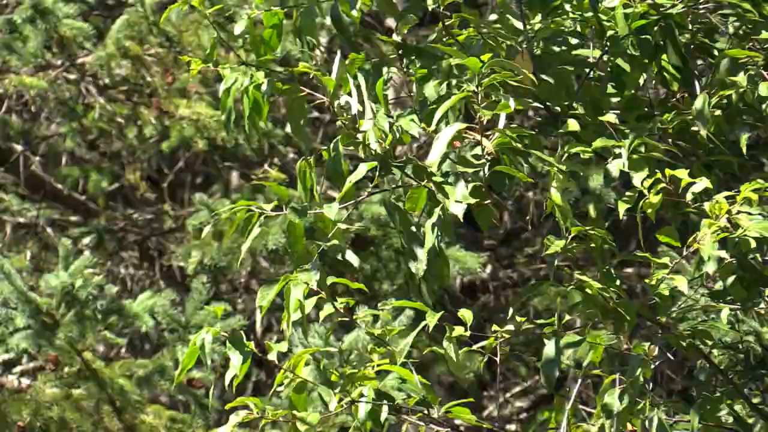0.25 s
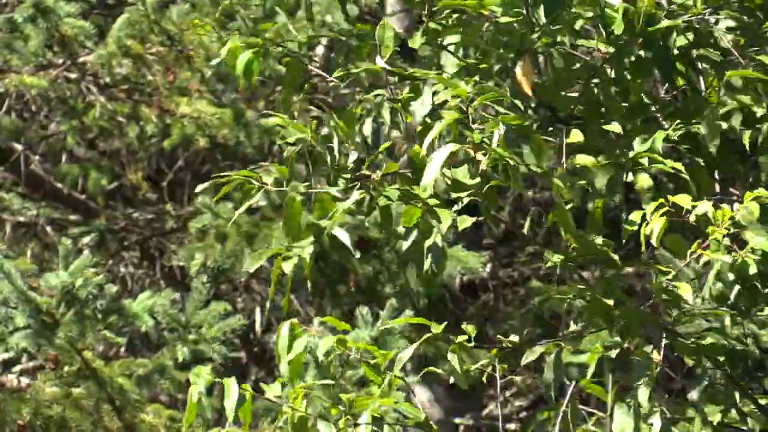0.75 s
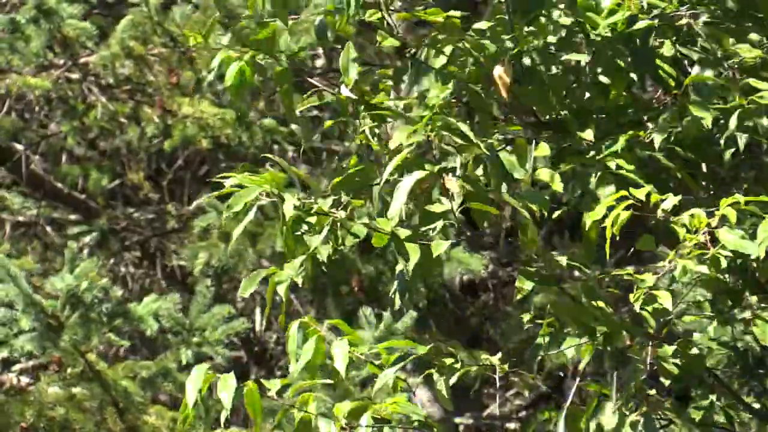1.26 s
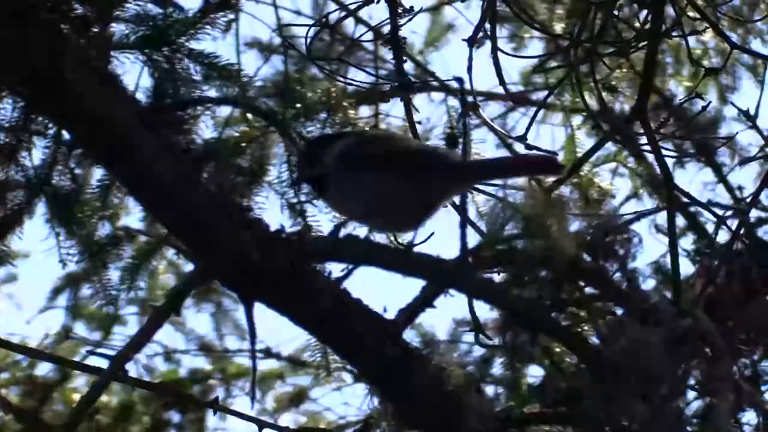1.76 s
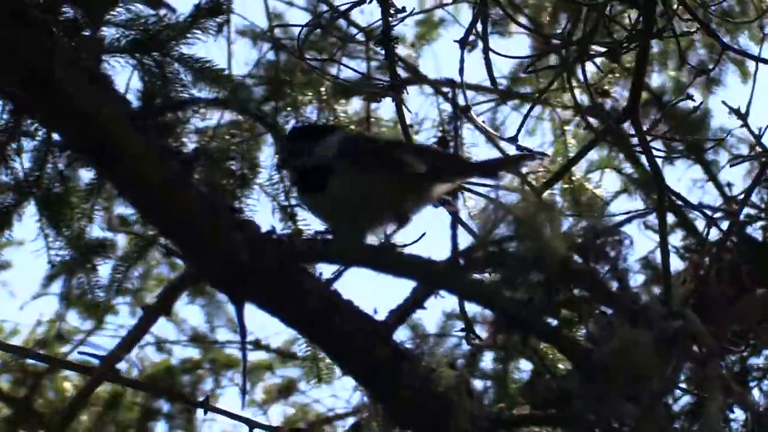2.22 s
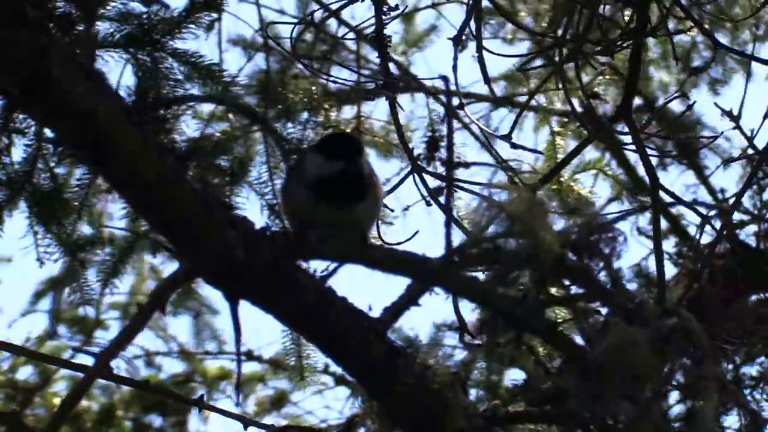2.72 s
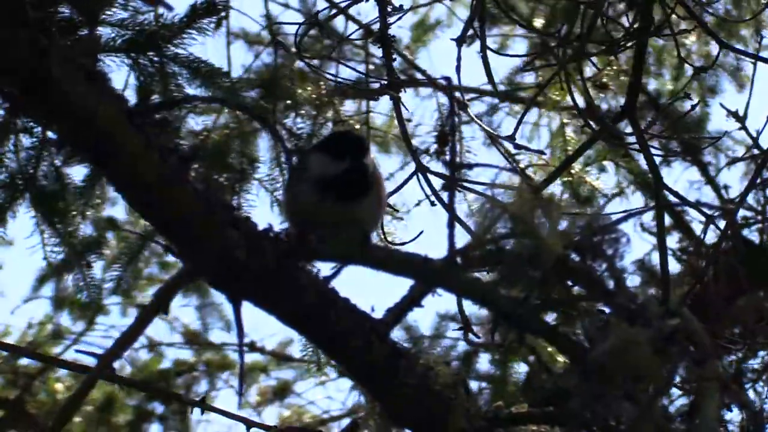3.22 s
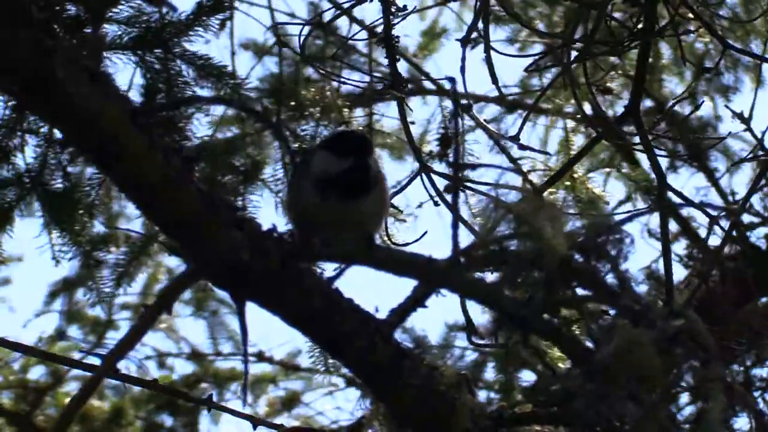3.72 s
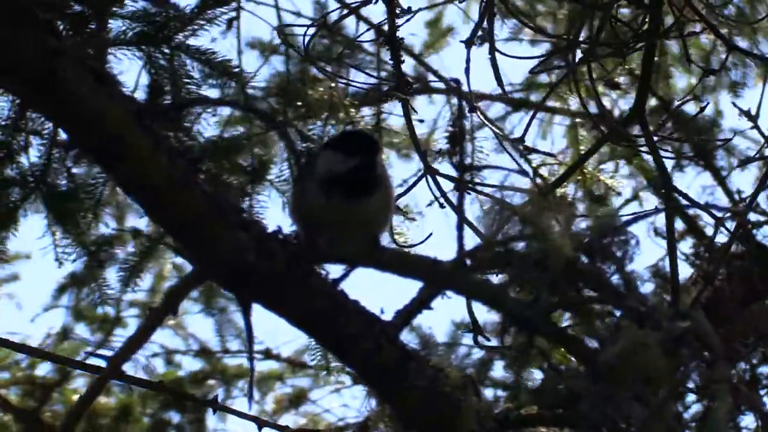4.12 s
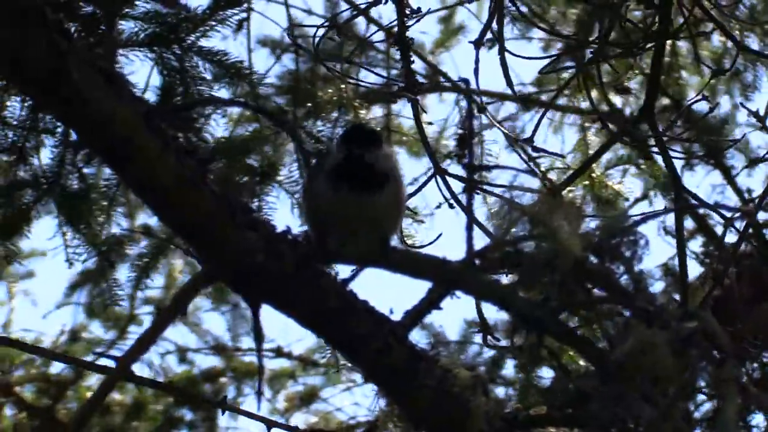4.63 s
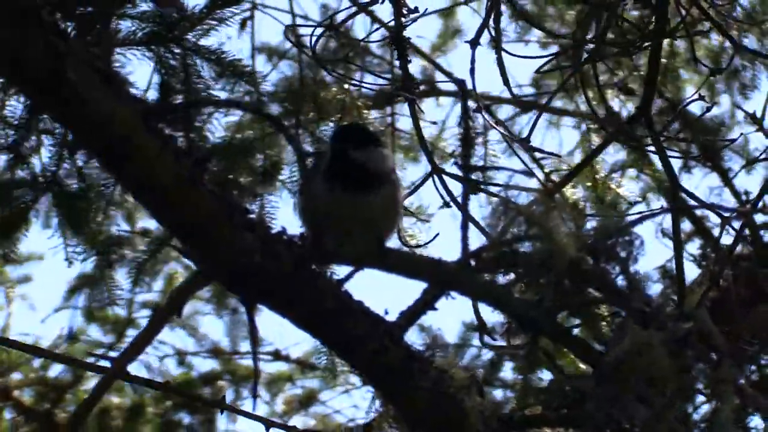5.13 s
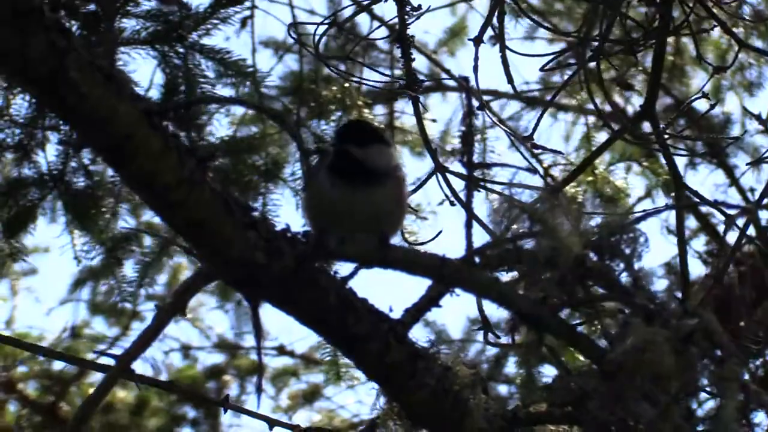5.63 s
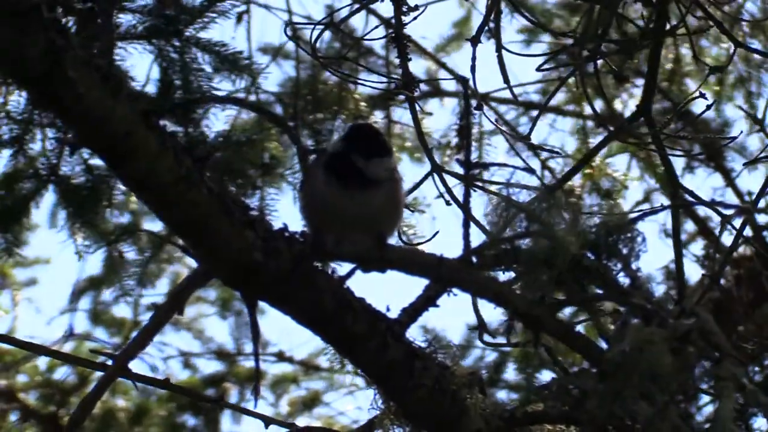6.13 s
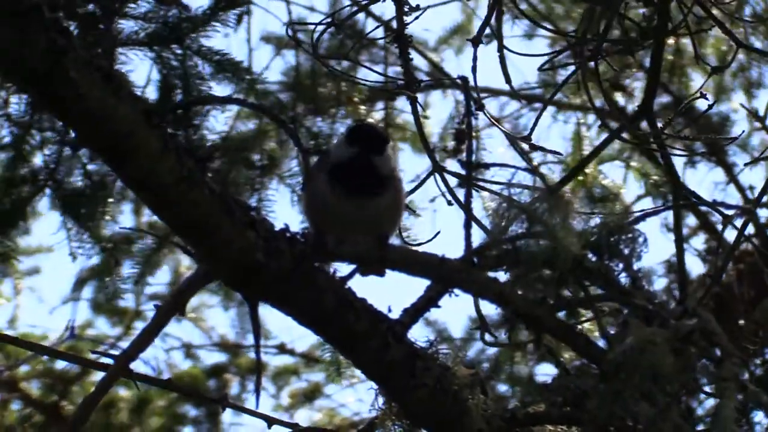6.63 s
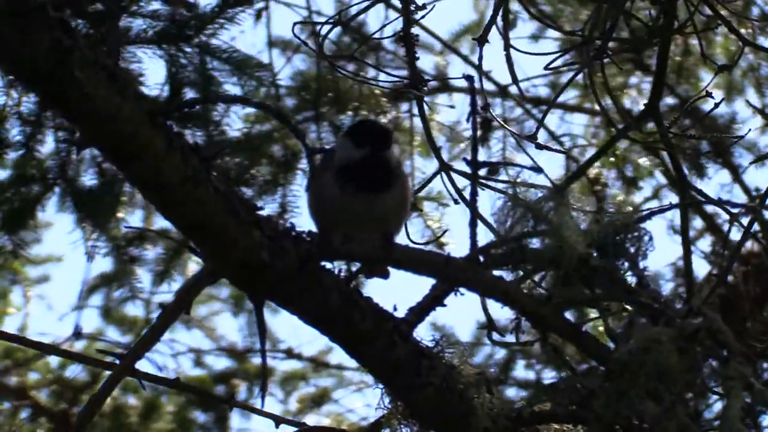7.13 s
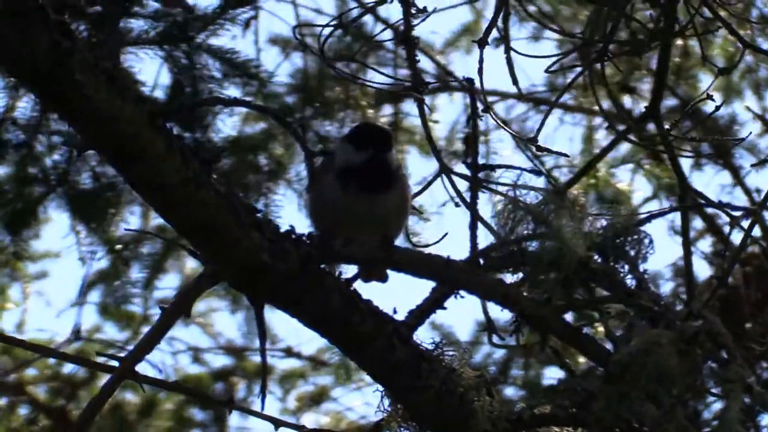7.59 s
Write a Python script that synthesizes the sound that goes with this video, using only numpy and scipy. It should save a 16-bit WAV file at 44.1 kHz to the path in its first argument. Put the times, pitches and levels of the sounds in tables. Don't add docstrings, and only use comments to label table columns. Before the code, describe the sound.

After a brief quiet hiss, raspy 'dee-dee-dee' bird calls come in quick series among conifers, with dull bumps and light wind rumble.

```python
import sys
import numpy as np
from scipy import signal
from scipy.fft import rfft, irfft, next_fast_len
from scipy.io import wavfile
from scipy.ndimage import uniform_filter1d

SR = 44100
rng = np.random.default_rng(int(sys.argv[2]) if len(sys.argv) > 2 else 0)


def voltage_ratio(decibels):
    exponent = np.asarray(decibels, float) / 20
    return 10 ** exponent


def waveform_to_disk(signal):
    frames = np.transpose(np.atleast_2d(signal))
    scaled = np.clip(frames, -1, 1) * 32767
    samples = np.round(scaled).astype(np.int16)
    wavfile.write(sys.argv[1], SR, samples)


N = 346626

# frequency in Hz, density in dB per Hz.
AIR_MID_SPECTRA = [
    [(15, -71), (25, -43), (43, -20), (78, -7), (107, -0.5), (402, -10), (512, -15.5), (1590, -21),
     (2720, -21), (2950, -15), (3200, -19.5), (5060, -23), (11100, -40), (15700, -43)],
    [(15, -26), (25, -13), (59, -22), (137, -1.5), (179, -1), (315, -4.5), (485, -7), (1120, -11),
     (1770, -13.5), (2820, -12), (3050, -9), (3300, -11.5), (4190, -10.7), (15700, -32.5)],
]
# frequency in Hz, density in dB per Hz.
AIR_SIDE_SPECTRA = [
    [(15, -64), (25, -38), (86, -21), (119, 1), (156, -14), (194, -7), (299, -10), (746, -8.5), (1150, -10),
     (2580, -9.5), (2950, -4.5), (4190, -16), (5200, -18.5), (15700, -40.5)],
    [(15, -63), (25, -33), (80, -9), (129, -8.5), (210, -7.5), (283, -10.5), (512, -9.5), (570, -10),
     (1120, -10.5), (1820, -11.5), (2650, -11), (2870, -12), (3120, -11), (15700, -38)],
]
# mid in dB, side in dB.
AIR_LEVELS = [(-51.5, -53.5), (-55.5, -55.5)]
SCENE_CHANGE_S = 1.662
# time in seconds, mid in dB, side in dB.
WIND_GUSTS = [(1.66, -71, -64), (1.85, -56.5, -52), (2.1, -66, -66), (2.45, -65.5, -63), (2.8, -67.5, -63),
              (3.2, -67, -72), (3.7, -67, -72), (4.2, -59, -59), (4.7, -65.5, -66), (5.2, -70, -76),
              (5.55, -66.5, -58), (6.1, -70, -61), (6.6, -69, -56.5), (7.05, -55.5, -46), (7.25, -65, -52),
              (7.5, -53.5, -49), (7.86, -52, -42)]
# frequency in Hz, density in dB.
WIND_MID_SPECTRUM = [(20, -7), (42, -8), (58, 4), (90, 2), (300, -64)]
WIND_SIDE_SPECTRUM = [(30, -44), (70, -4), (130, 0), (300, -22), (500, -57)]
WHINE_HZ, WHINE_DB = 15734, -87
# start in seconds, side peak in dB, mid peak in dB, ring in Hz.
BODY_KNOCKS = [(1.96, -43, -55, 100), (3.607, -34, -44, 135), (4.119, -35, -44, 118),
               (4.6, -29, -44.5, 120), (5.736, -27.5, -39.5, 127), (5.843, -34, -40.5, 93),
               (7.025, -41, -39, 113), (7.138, -42, -48.5, 120), (7.353, -27, -36.5, 110),
               (7.414, -39, -41.5, 117), (7.601, -43, -54, 120), (7.684, -22, -32, 104),
               (7.852, -27, -44, 120)]
# start in seconds, peak in dB.
FINGER_TAPS = [
    (.9105, -43),
    (1.069, -34),
    (1.077, -30),
    (1.0825, -36),
    (1.0856, -30.5),
    (5.737, -40),
]
# start in seconds, peak in dB, ring in Hz, length in seconds.
SNAPS = [
    (1.9375, -28, 9100, 0.0014),
    (3.278, -34, 9000, .001),
    (5.738, -36, 5000, 0.0013),
    (5.821, -29, 7500, .0007),
    (6.44, -35.5, 8900, .001),
]

# start in seconds, length in seconds, effort in dB,
# upper voice at the crest in Hz, gap down to the lower voice in Hz.
DISTANT_NOTES = [
    (5.065, .135, -53.5, 1592, 310),
    (5.27, .09, -58, 1470, 390),
]
FAR_NOTES = [
    (3.456, .1, -44, 1792, 260),
    (3.568, .131, -42, 1807, 319),
    (3.718, .178, -43.5, 1810, 325),
    (3.888, .038, -48, 1830, 288),
]
CHATTER_NOTES = [(1.734, .073, -40.5, 1920, 285), (1.831, .093, -42, 1890, 220),
                 (2.992, .074, -42, 1950, 280), (3.078, .076, -41.5, 1900, 293),
                 (3.168, .081, -41.5, 1930, 262), (3.282, .084, -42.5, 1917, 350),
                 (4.251, .08, -41, 1946, 304), (4.343, .085, -40.5, 1956, 340),
                 (4.45, .084, -41, 1916, 277), (4.554, .077, -41, 1916, 270),
                 (4.658, .078, -40.5, 1940, 270), (4.754, .072, -40, 2010, 266),
                 (4.842, .082, -39.5, 2000, 220), (4.942, .088, -41, 1957, 333),
                 (7.193, .089, -39.5, 1963, 320)]
CHIP_NOTES = [(1.656, .068, -41, 1937, 300), (2.774, .045, -41.5, 1870, 235), (2.841, .055, -42, 2020, 330),
              (2.916, .062, -41.5, 2035, 321), (3.968, .058, -44, 1960, 240), (4.036, .056, -43, 2040, 450),
              (4.101, .056, -41.5, 2020, 270), (4.17, .07, -42, 1916, 260), (6.815, .05, -49, 1950, 280),
              (6.886, .053, -44, 1920, 280), (6.959, .06, -43, 2055, 250), (7.029, .057, -43, 1950, 150),
              (7.116, .06, -42, 1950, 239), (7.326, .068, -45.5, 1880, 260)]
DRAWL_NOTES = [
    (2.416, .091, -36.5, 1768, 352),
    (2.513, .119, -36, 1790, 362),
    (2.644, .138, -36.5, 1772, 354),
    (2.816, .16, -42.5, 1573, 314),
    (6.65, .131, -38.5, 1742, 354),
    (6.798, .171, -39.5, 1726, 346),
    (7.011, .155, -40, 1655, 328),
    (7.205, .135, -45, 1570, 310),
]
OPENER_NOTES = [
    (2.331, .079, -39.5, 1616, 332),
    (6.493, .067, -42, 1595, 314),
    (6.568, .074, -41, 1770, 344),
]
FAR_MIX = [(-40, -27, -36, -17.5, -19.5, -24), (-35, -29, -6, -4.5, -11.5, -15),
           (-10.5, -21, -17, -14, -28, -23), (-28, -33, -30, -24, -32, -29), (-39, -38, -30, -41, -35, -41),
           (-37, -33, -40, -42, -45, -49)]
CHATTER_MIX = [(-29, -70, -39, -13.5, -8.5, -16, -38), (-33.5, -27.5, -4, -3.5, -28.5, -27, -24),
               (-10.5, -13, -18, -7, -34, -19, -30), (-25, -35, -23.5, -21, -43, -34, -34),
               (-28, -32, -40, -26, -56, -48, -65), (-34, -28, -40, -44, -60, -54, -52)]
DRAWL_MIX = [(-74, -70, -16, -8.5, -15), (-12, -5.5, -1.5, -6.5, -9.5), (-9.5, -12, -20, -23, -39),
             (-26, -26, -45, -28, -36), (-41, -35, -41, -44, -50), (-63, -57, -56, -59, -64)]

# attack in seconds, level after the attack in dB, place of the peak from 0 to 1,
# level before the release in dB, release in seconds.
DISTANT_SWELL = (.019, -1.5, .6, -1.5, .019)
FAR_SWELL = (.017, -5.5, .38, -4, .017)
CHATTER_SWELL = (.013, -7, .58, -3, .019)
CHIP_SWELL = (.017, -1.5, .5, -.7, .018)
DRAWL_SWELL = (.012, -6, .62, -2.5, .015)
# time to the crest in seconds, scoop up from 0 to 1, drop after from 0 to 1,
# brightness in dB a multiple, more for each 100 Hz lower in dB, time until the voices lock in seconds.
DISTANT_ARCH = (.07, .12, .095, 4., 1.5, .022)
FAR_ARCH = (.045, .18, .1, -.1, .1, .022)
CHATTER_ARCH = (.054, .2, .17, .1, .1, .019)
CHIP_ARCH = (.029, .28, .2, .1, .1, .014)
DRAWL_ARCH = (.075, .18, .08, .3, 1.3, .027)
OPENER_ARCH = (.045, .2, .06, .3, 1.8, .036)
SHUT_DB, CUT_DB = -30, -26
BREAK_S = .013
LATEST_CREST, PLAIN_HZ = .85, 1780
EDGE_HZ = 15830


def evened(x):
    return x / np.sqrt(np.mean(x ** 2) + 1e-20)


def add(mix, s, sound):
    part = mix[..., round(s * SR):][..., :sound.shape[-1]]
    part += sound[..., :part.shape[-1]]


def coloured(points):
    hz, db = np.transpose(points)
    size = next_fast_len(N, True)
    f = np.fft.rfftfreq(size, 1 / SR)
    weight = voltage_ratio(np.interp(np.log(f + 1), np.log(hz), db))
    return evened(irfft(rfft(rng.standard_normal(size)) * weight, size)[:N])


def wander(length, span_s):
    bell = signal.windows.hann(int(1.5 * span_s * SR) + 3)
    return evened(signal.oaconvolve(rng.standard_normal(length), bell, "same"))


def air():
    shots = []
    for mid, side, (mid_db, side_db) in zip(AIR_MID_SPECTRA, AIR_SIDE_SPECTRA, AIR_LEVELS):
        shots.append(np.array([voltage_ratio(mid_db) * coloured(mid), voltage_ratio(side_db) * coloured(side)]))
    since = np.arange(N) / SR - SCENE_CHANGE_S
    dip = np.clip(abs(since) / 0.0085, .3, 1)
    return np.where(since < 0, *shots) * dip * voltage_ratio(.5 * wander(N, 0.18))


def wind():
    s, *levels = np.transpose(WIND_GUSTS)
    t = np.arange(N) / SR
    rumble = []
    for spectrum, db in zip([WIND_MID_SPECTRUM, WIND_SIDE_SPECTRUM], levels):
        gust_db = np.interp(t, s, db, left=-99) + 4.4 * wander(N, 0.027)
        rumble.append(coloured(spectrum) * voltage_ratio(gust_db))
    return np.array(rumble)


def whine():
    return voltage_ratio(WHINE_DB) * np.sqrt(2) * np.sin(2 * np.pi * WHINE_HZ * np.arange(N) / SR)


def knocks():
    out, t = np.zeros((2, N)), np.arange(5000) / SR
    ring = (1 - np.exp(-t / 0.0029)) * np.exp(-t / .011) * 1.86
    for s, side_db, mid_db, hz in BODY_KNOCKS:
        for delay, bounce_db in [(0, -0.5), (.025, -3.5), (.052, -15)]:
            late, detune, turn = rng.random(3)
            side = np.sin(2 * np.pi * hz * (1.05 - 0.21 * detune) * t)
            mid = np.sin(2 * np.pi * hz * (0.592 + 0.54 * turn) * t + 2.03)
            side += 0.32 * np.sin(2 * np.pi * 1.95 * hz * t) * np.exp(-t / .01)
            mid += 0.31 * np.sin(2 * np.pi * 2.19 * hz * t) * np.exp(-t / 0.0082)
            blow = np.array([voltage_ratio(mid_db) * mid, voltage_ratio(side_db) * side])
            add(out, s + delay * (.9 + 0.266 * late), voltage_ratio(bounce_db) * ring * blow)
    mid = signal.lfilter(*signal.butter(2, 35, "high", fs=SR), out[0])
    side = signal.lfilter(*signal.butter(3, 60, "high", fs=SR), out[1])
    return np.array([mid, side])


def taps():
    out, t = np.zeros(N), np.arange(600) / SR
    push = (1 - t / 0.005) * np.exp(-t / 0.0027) * np.minimum(t / 0.00071, 1)
    for s, db in FINGER_TAPS:
        add(out, s, voltage_ratio(db) * push)
    return signal.lfilter(*signal.butter(2, 70, "high", fs=SR), out)


def clicks():
    out = np.zeros(N)
    for s, db, hz, length in SNAPS:
        t = np.arange(0, length, 1 / SR)
        grit = uniform_filter1d(rng.standard_normal(len(t)), size=3)
        burst = np.sin(2 * np.pi * hz * t) + 0.69 * np.sin(2 * np.pi * 0.36 * hz * t) + 2.1 * grit
        add(out, s, voltage_ratio(db) * 0.31 * burst * np.sin(np.pi * (t / length) ** .6))
    return signal.lfilter(*signal.butter(2, 2000, "high", fs=SR), out)


def wood(x, t60):
    size = SR // 10
    echoes = rng.choice([-1., 1.], (2, size)) * (rng.random((2, size)) < .05)
    echoes *= voltage_ratio(-60 * np.arange(size) / SR / t60)
    echoes[:, :150] = 0
    echoes /= np.linalg.norm(echoes, axis=1)[:, None]
    return signal.oaconvolve(x[None], echoes, axes=1)[:, :N]


def syrinx(t, upper_hz, gap_hz, tones, below, throat, bright_db, flutter_db):
    knots = np.arange(t[0], t[-1] + .012, .012)
    slow = slice(None, None, 32)
    upper, gap = [np.exp(2j * np.pi * np.cumsum(hz) / SR) for hz in (upper_hz, gap_hz)]
    gap_powers = [gap ** (step - below) for step in range(len(tones[0]))]
    voice = np.zeros(len(t), complex)
    for multiple, levels in enumerate(tones, 1):
        partial = upper ** multiple
        for step, tone_db in enumerate(levels):
            hz = multiple * upper_hz[slow] + (step - below) * gap_hz[slow]
            lift_db = bright_db * (multiple - 2)
            for centre, width, lift in throat:
                lift_db = lift_db + lift / (1 + ((hz - centre) / width) ** 2)
            shimmer_db = flutter_db * np.interp(t[slow], knots, rng.standard_normal(len(knots)))
            level = np.interp(t, t[slow], voltage_ratio(tone_db + lift_db + shimmer_db))
            voice += level * partial * gap_powers[step] * np.exp(2j * np.pi * rng.random())
    return voice / np.sqrt(uniform_filter1d(abs(voice) ** 2, 600) / 2)


def note(row, swell, arch, tones, below, throat, waver_hz, flutter_db, rasp_db):
    start, length, peak_db, upper_hz, gap_hz = row
    attack_s, early_db, peak, late_db, release_s = swell
    crest_s, scoop, drop, bright_db, lower_db, lock_s = arch
    s = start + np.sort([0, attack_s, peak * length, length - release_s, length])
    t = np.arange(s[0], s[-1], 1 / SR)

    db = peak_db + np.array([SHUT_DB, early_db, 0, late_db, late_db])
    effort_db = 20 * np.log10(np.interp(t, s, voltage_ratio(.75 * db))) / .75
    effort_db += CUT_DB * np.clip((t - s[-2]) / release_s, 0, 1) ** 1.4

    voiced_s = length - release_s / 2
    crest = min(crest_s / voiced_s, LATEST_CREST)
    u = (t - start) / voiced_s
    rise = scoop * (1 - u / crest) ** 2
    fall = drop * (abs(u - crest) / (1 - crest)) ** 4.5
    bend = 1 - np.where(u < crest, rise, fall)
    bright_db += lower_db * (PLAIN_HZ - upper_hz) / 100
    upper_hz = upper_hz * bend + waver_hz * wander(len(t), 0.0035)
    gap_hz = gap_hz * bend + .3 * waver_hz * wander(len(t), 0.0027)
    voice = syrinx(t, upper_hz, gap_hz, tones, below, throat, bright_db, flutter_db)

    edge = np.minimum((t - t[0]) / lock_s, (t[-1] - t) / BREAK_S)
    weak_db = 13 * np.exp(-edge ** 2)
    rasp = voltage_ratio(rasp_db + weak_db) * wander(len(t), .0009)
    sound = (voice * np.exp(1j * rasp)).real
    sound += voltage_ratio(-36) * np.diff(rng.standard_normal(len(t) + 1))
    return s[0], voltage_ratio(effort_db) * sound * signal.windows.tukey(len(t), .1)


def bird(calls, pan_db, wet_db, **voice):
    direct = np.zeros(N)
    for notes, swell, arch in calls:
        for row in notes:
            add(direct, *note(row, swell, arch, **voice))
    pan = voltage_ratio(np.array([[pan_db], [-pan_db]]) / 2)
    return direct * pan + voltage_ratio(wet_db) * wood(direct, t60=0.051)


def birds():
    steady = dict(waver_hz=8, flutter_db=2.2, rasp_db=-10)
    shaky = dict(waver_hz=15, flutter_db=1.3, rasp_db=-8.5)
    blurred = dict(waver_hz=35, flutter_db=3., rasp_db=2)
    distant = bird([(DISTANT_NOTES, DISTANT_SWELL, DISTANT_ARCH)], .1, -5,
                   tones=DRAWL_MIX, below=3, throat=[(2700, 600, 3.)], **blurred)
    far = bird([(FAR_NOTES, FAR_SWELL, FAR_ARCH)], .2, -2,
               tones=FAR_MIX, below=4, throat=[(3100, 400, 2.5)], **steady)
    chatter = [(CHATTER_NOTES, CHATTER_SWELL, CHATTER_ARCH), (CHIP_NOTES, CHIP_SWELL, CHIP_ARCH)]
    chatterer = bird(chatter, 2.6, -8, tones=CHATTER_MIX, below=4, throat=[(3450, 350, 9.)], **shaky)
    drawl = [(DRAWL_NOTES, DRAWL_SWELL, DRAWL_ARCH), (OPENER_NOTES, DRAWL_SWELL, OPENER_ARCH)]
    drawler = bird(drawl, 0.94, -7.5, tones=DRAWL_MIX, below=3,
                   throat=[(3150, 550, 2.5), (4400, 350, 1.8)], **steady)
    return distant + far + chatterer + drawler


def scene():
    mid, side = air() + wind() + knocks()
    snaps = clicks()
    mid = mid + whine() + taps() + snaps
    side = side + .3 * np.roll(snaps, 3)
    return np.array([mid + side, mid - side]) + birds()


def top_cut(x):
    return signal.sosfilt(signal.butter(12, 16370, fs=SR, output="sos"), x)


def record(dry):
    limit = signal.firwin(1023, EDGE_HZ, window=("kaiser", 9), fs=SR)
    mix = signal.oaconvolve(dry, limit[None], "same")
    return top_cut(mix)


dry = scene()
out = record(dry)
waveform_to_disk(out)
```